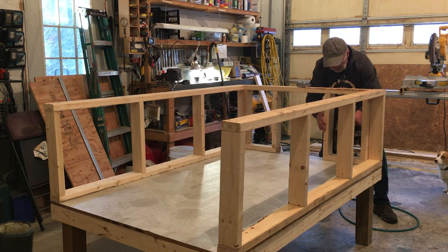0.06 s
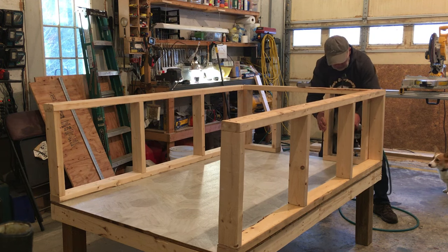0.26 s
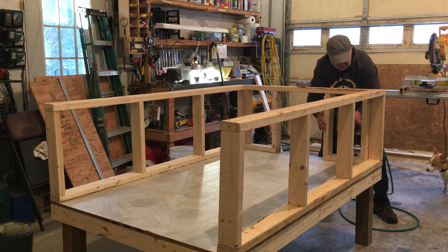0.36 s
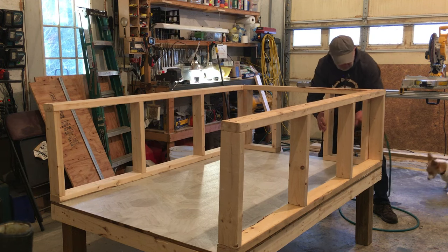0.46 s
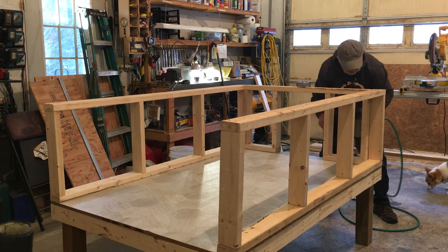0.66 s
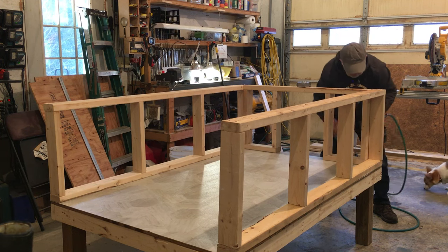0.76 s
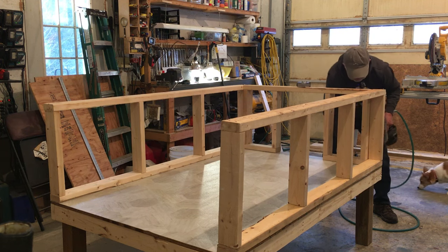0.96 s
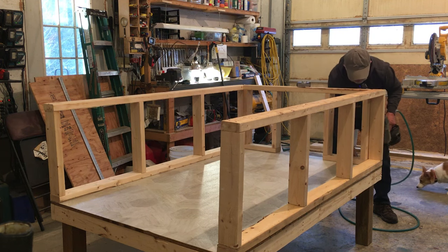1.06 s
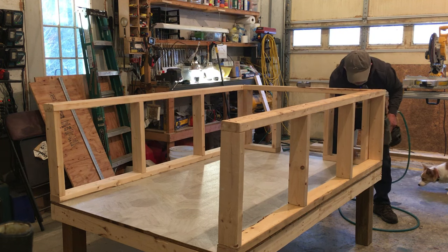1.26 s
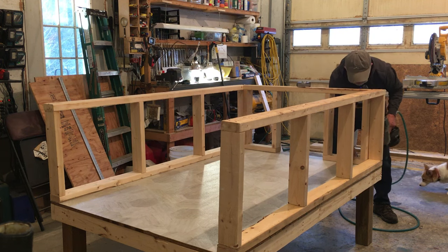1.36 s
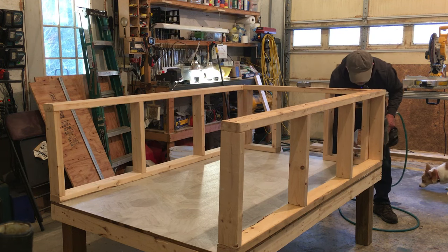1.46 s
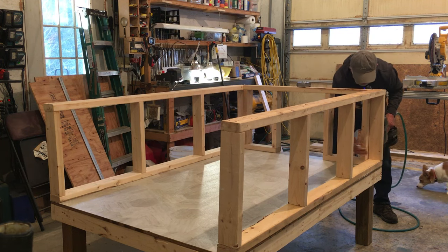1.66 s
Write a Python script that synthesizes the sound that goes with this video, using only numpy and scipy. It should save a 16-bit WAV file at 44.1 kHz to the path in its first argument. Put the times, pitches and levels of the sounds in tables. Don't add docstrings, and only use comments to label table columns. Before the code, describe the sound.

A pneumatic nail gun fires once into a wooden frame, a hard overloaded crack with a burst of compressed air and a knock, ringing through a garage workshop; later soft boot thuds, scuffs and tiny metallic tinkles.

```python
import sys
import numpy as np
from scipy import signal
from scipy.fft import rfft, irfft
from scipy.io import wavfile
from scipy.ndimage import map_coordinates

SR = 44100
rng = np.random.default_rng(int(sys.argv[2]) if len(sys.argv) > 2 else 0)


def inscribe(sig):
    pcm = np.round(np.clip(np.atleast_2d(sig).T, -1, 1) * 32767)
    wavfile.write(sys.argv[1], SR, pcm.astype(np.int16))


def gain_from_db(level_db):
    decades = np.asarray(level_db, float) / 20
    return 10 ** decades


N = 74970
LEAD = SR // 2
M = N + LEAD
T = (np.arange(M) - LEAD) / SR

# (frequency [Hz], t60 [s])
ECHO_T60 = [(60, 0.87), (150, 0.57), (500, 0.54), (1500, 0.48), (4000, 0.45), (8000, 0.34), (15000, .2)]
# (frequency [Hz], level [dB])
ECHO_COLOUR = [(60, -1), (200, -2), (700, -1.5), (1600, 3.5), (4000, -3.5), (9000, 2), (15000, -1)]
# (frequency [Hz], level [dB])
HUSH_COLOUR = [(38, -22.5), (60, -0.5), (300, -4), (500, -9), (1000, -14.5), (2500, -26), (12500, -31.5),
               (15500, -44)]
# (frequency [Hz], level [dB])
HUM = [(333.8, -77), (500.6, -78.5), (748.3, -85.5), (1001, -84)]
# (start [s], length [s], level [dB], centre
# [Hz], width [Hz])
SCUFFS = [(.06, .14, -66.5, 3040, 900), (.044, .2, -66, 4400, 610), (.041, .16, -69.5, 7000, 1500),
          (.56, .1, -70, 12370, 4800), (1.109, .01, -57, 2600, 3000), (1.139, .016, -52.5, 3400, 1300),
          (1.139, .02, -63, 7500, 5000), (1.162, .025, -64, 2600, 1500), (1.115, .03, -66, 6000, 8000),
          (1.2, .1, -71, 5400, 6000), (1.12, .035, -64, 2000, 1470), (1.33, .08, -76, 4500, 4000),
          (1.412, .04, -64, 4740, 5100), (1.43, .045, -62.5, 4100, 1800), (1.426, .055, -65.5, 8800, 4500),
          (1.425, .14, -69, 1350, 2000), (1.48, .065, -66.5, 7000, 7000), (1.506, .027, -64, 3300, 1700),
          (1.53, .11, -72, 4500, 5000), (1.626, .07, -70, 6500, 8000), (1.22, .58, -75, 2480, 3000),
          (.989, .01, -68, 2900, 900), (.989, .008, -73, 8800, 2500), (1.513, .008, -63, 2800, 2500),
         (1.099, .024, -60, 7500, 5000), (1.095, .21, -66, 6000, 9000)]
# (start [s], length [s], level [dB], centre [Hz], width [Hz])
TINKLES = [(.66, .42, -83, 5728, 130), (.66, .36, -84, 6182, 100), (.68, .2, -88, 9205, 60),
           (.66, .3, -86, 8300, 300), (1.35, .11, -81, 5020, 200), (1.365, .026, -81, 6510, 80),
           (1.46, .04, -76, 5050, 350), (1.485, .035, -75, 5350, 350), (1.505, .04, -74, 5600, 350),
           (1.53, .08, -77, 5450, 450), (1.58, .16, -79, 5450, 400), (1.435, .04, -73, 4650, 250),
           (1.445, .025, -74, 8500, 700), (1.645, .05, -78, 3540, 160), (1.435, .035, -83, 14000, 900)]
# (time [s], level [dB], contact [ms], crack level [dB])
BUMPS = [(.2322, -17.5, .5, -32.5), (.2345, -17.5, .5, -42), (.2604, 4.5, 0.54, -19.5),
         (.2664, -1.5, 0.21, -10), (.271, -5, 0.2, -11), (.2775, 1.5, .6, -11.5), (.2816, -7, .7, -13.5),
         (.2888, -13, .2, -8.5), (.2918, -6.5, 0.84, -17), (.2955, -4.5, .8, -11.5), (.2992, -8, .7, -14.5)]
# (frequency [Hz], level [dB], t60 [s])
GUN_MODES = [(362, -11.5, 0.01), (517, -9.5, 0.02), (620, 2, .03), (719, -1.5, 0.024), (838, -5, 0.02),
             (994, -4, 0.02), (1273, -6.5, 0.023), (1861, -3.5, 0.028), (2111, -2, .022), (3070, -4, .02),
             (4014, -7, 0.04)]
# (time [s], level [dB], contact [ms], crack level [dB])
BLOWS = [
    (0.2476, -4, .6, -11.5),
    (0.2488, -5, 2.4, -17.5),
    (0.2546, -6, 4.3, -25.5),
]
# (time [s], level [dB], contact [ms])
RECOIL = [
    (0.2522, -2.5, 2.6),
    (0.2581, -9, 1.7),
]
# (frequency [Hz], level [dB], t60 [s])
FRAME_MODES = [(127.73, -8.5, .07), (174, -10, 0.083), (244.5, -7, 0.14), (304.3, -8.5, 0.09),
               (387, -7.5, .025), (520, -1.5, .02), (600, -2, 0.0046), (832, -3, 0.034),
               (1083, -0.5, 0.045)]
# (start [s], attack [s], hold [s], release t60 [s], level [dB], tilt [dB per octave])
VALVE_AIR = (.2328, .0005, .007, .07, -24, .1)
# (start [s], attack [s], hold [s], release t60 [s], level [dB], tilt [dB per octave])
NAIL_AIR = (.2478, .001, .008, .06, -15, 1.5)
# (start [s], attack [s], hold [s], release t60 [s], level [dB], tilt [dB per octave])
EXHAUST = [
    (0.262, 0.0059, 0.0067, 0.057, 1.5, -4.5),
    (0.271, .008, 0.024, 0.1, -3.5, 2),
]
# (frequency [Hz], level [dB])
AIR_COLOUR = [(400, -18), (1000, -1), (1650, -8), (2000, -7.5), (2600, -4), (4300, 0), (9000, -6.5),
              (15800, -15)]
BOOM_HZ = 59.2, 74.5, 102.3
# (level [dB], t60 [s])
BOOM_RING = [(-31.5, 1), (-32.5, 0.7), (-35.5, .7)]
# (frequency [Hz], level [dB], t60 [s])
HOUSING_MODES = [(420, -2, 0.03), (501, -3.5, .03), (760, -7.5, 0.036), (116, -14, 0.08)]
# (time [s], level [dB], contact [ms])
STEPS = [(1.1147, -41.5, 0.81), (1.1201, -52.5, 1.1), (1.128, -51.5, 1), (1.1342, -44, 2.3),
         (1.148, -45, 1.5), (1.187, -48.5, 3.2), (1.219, -61, 2.3), (1.337, -62, 4.4), (1.41, -57, 4.9),
         (1.551, -61.5, 1.7), (1.63, -59.5, 1.3), (1.69, -56, 3.4)]
# (frequency [Hz], level [dB], t60 [s])
FLOORBOARD_MODES = [(73, -12, 0.18), (131, 3.5, 0.06), (174, -14, 0.1), (261, -4, 0.085),
                    (324, -4.5, 0.039), (417, -1, 0.011), (530, -4.5, 0.018), (710, 2, 0.018),
                    (900, -19, 0.023), (1200, -2, 0.013)]


def curve(table, hz):
    a = np.array(table, float)
    return np.interp(np.log(hz), np.log(a[:, 0]), a[:, 1])


def noise(gain):
    hz = np.arange(M // 2 + 1) * SR / M + 1
    x = irfft(rfft(rng.standard_normal(M)) * gain(hz), M)
    return x / np.sqrt(np.mean(x ** 2))


def flutter(rate_hz):
    return noise(lambda hz: 1 / (1 + (hz / rate_hz) ** 2))


def push(start, db, ms):
    phase = np.clip((T - start) / (ms / 1000), 0, 1)
    return gain_from_db(db) * np.sin(np.pi * phase) / (ms * SR / 2000)


def ring(force, modes, alternate=True):
    out = 0
    for k, (hz, db, t60) in enumerate(modes):
        pole = np.exp(2j * np.pi * hz / SR - np.log(1000) / (t60 * SR))
        sign = (-1) ** (k * alternate)
        out = out + sign * gain_from_db(db) * signal.lfilter([1], [1, -pole], force).imag
    return out


def gate(start, attack, hold, t60):
    release = np.clip(T - start - attack - hold, 0, 9)
    return np.clip((T - start) / attack, 0, 1) * gain_from_db(-60 * release / t60)


def cut(x, hz):
    return signal.sosfilt(signal.butter(2, hz, "high", fs=SR, output="sos"), x)


def slide(rows):
    out = 0
    for start, length, db, hz, width in rows:
        swell = np.sin(np.pi * np.clip((T - start) / length, 0, 1)).clip(0) ** .7
        band = noise(lambda f: 1 / (1 + ((f - hz * hz / f) / width) ** 2) / (1 + (f / 13820) ** 2))
        out = out + gain_from_db(db) * swell * band
    return out * gain_from_db(0.5 * flutter(120))


def earlier(x):
    lead_s = .56
    return np.roll(x, -int(lead_s * SR)) * (T < .5)


def workshop_echo(x):
    late_db, late_stretch, rise_s = -26, 1.8, .008
    drift_ms, drift_hz, low_cut_hz = .12, 18, 60
    t = np.arange(M) / SR
    tail = 0
    for hz in 40 * 2 ** (np.arange(27) / 3):
        t60 = curve(ECHO_T60, hz)
        band = noise(lambda f: np.exp(-(np.log2(f / hz) * 4) ** 2))
        decay = gain_from_db(-60 * t / t60) + gain_from_db(late_db - 60 * t / t60 / late_stretch)
        tail = tail + band * gain_from_db(curve(ECHO_COLOUR, hz)) * decay * np.sqrt(hz / t60)
    tail = tail * np.clip(t / rise_s, 0, 1)
    echo = signal.fftconvolve(x, tail / np.sqrt(np.sum(tail ** 2)))[:M]
    drift = drift_ms / 1000 * SR * flutter(drift_hz)
    echo = map_coordinates(echo, [np.arange(M) + drift], mode="mirror")
    return cut(cut(echo, low_cut_hz), low_cut_hz)


def hush():
    return gain_from_db(-66.5 + 1.5 * flutter(4)) * noise(lambda hz: gain_from_db(curve(HUSH_COLOUR, hz)))


def hum():
    return sum(gain_from_db(db + 3 + 7.1 * flutter(19)) * np.sin(2 * np.pi * hz * T) for hz, db in HUM)


def scuffs():
    return slide(SCUFFS)


def bump_force():
    return sum(push(start, db, ms) for start, db, ms, _ in BUMPS)


def gun_body():
    return ring(bump_force(), GUN_MODES)


def crack():
    snap = sum(gain_from_db(db) * gate(start, 0.0006, .0005, 0.017) for start, _, _, db in BLOWS + BUMPS)
    return snap * noise(lambda hz: hz / (hz + 900) / (1 + hz / 7000))


def exhaust():
    out = 0
    for *envelope, db, tilt_db in [VALVE_AIR, NAIL_AIR] + EXHAUST:
        jet = noise(lambda hz: gain_from_db(curve(AIR_COLOUR, hz) + tilt_db * np.log2(hz)))
        out = out + gain_from_db(db) * gate(*envelope) * jet
    return out * gain_from_db(1.2 * flutter(250))


def nail_force():
    blows = sum(push(start, db, ms) for start, db, ms, _ in BLOWS)
    return blows - sum(push(*row) for row in RECOIL)


def timber():
    return ring(nail_force() + gain_from_db(-13) * bump_force(), FRAME_MODES, alternate=False)


def boom():
    return ring(np.abs(nail_force()), [(hz, *row) for hz, row in zip(BOOM_HZ, BOOM_RING)])


def piston_return():
    return -ring(push(.3231, -1, 0.6), HOUSING_MODES, alternate=False)


def shot():
    struck = gun_body() + timber() + piston_return()
    return cut(cut(struck, 140), 140) + crack() + exhaust()


def tinkles():
    return slide(TINKLES)


def steps():
    force = sum(push(*row) for row in STEPS)
    return cut(ring(force, FLOORBOARD_MODES, alternate=False), 83)


def scene():
    gun, rumble, boots = shot(), boom(), steps()
    grit = scuffs() + tinkles()
    both_shots = gun + gain_from_db(0.5) * earlier(gun)
    echo = workshop_echo(gain_from_db(-8.5) * both_shots + boots + gain_from_db(-8.5) * grit)
    direct = gun + rumble + gain_from_db(1.0) * earlier(rumble) + boots + grit
    return (direct + echo + hush() + hum())[None, LEAD:]


def band_limit(x):
    return signal.sosfilt(signal.butter(12, 15920, fs=SR, output="sos"), x)


def record(dry):
    drive_db, knee, ceiling = 1.08, 9, .91
    x = gain_from_db(drive_db) * cut(dry, 40)
    x = ceiling * x / (1 + np.abs(x) ** knee) ** (1 / knee)
    x = cut(x, 40)
    x = signal.sosfiltfilt(signal.ellip(6, .1, 40, 15800, fs=SR, output="sos"), x)
    return band_limit(x)


dry = scene()
out = record(dry)
inscribe(out)
```